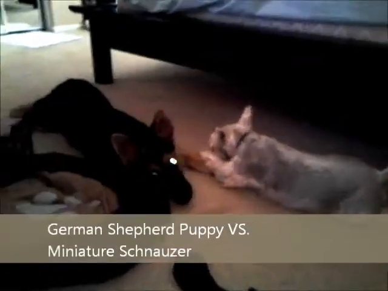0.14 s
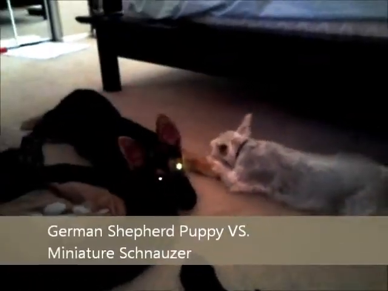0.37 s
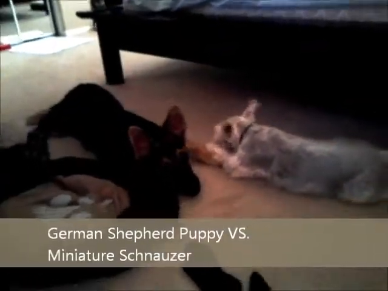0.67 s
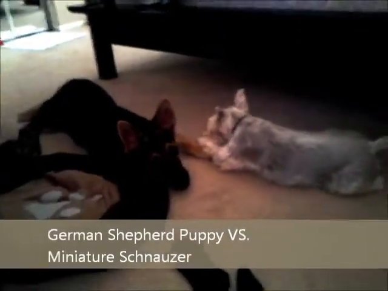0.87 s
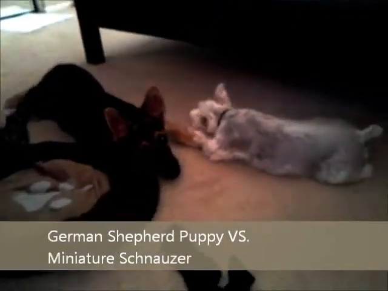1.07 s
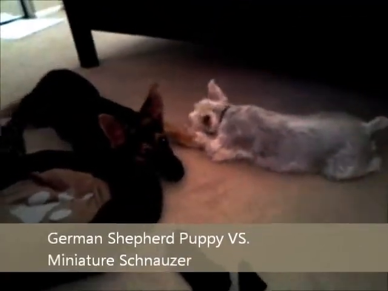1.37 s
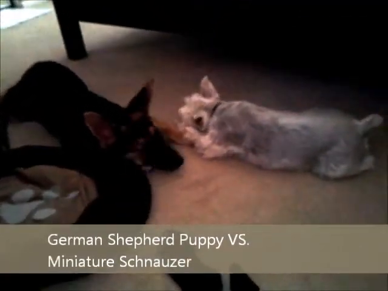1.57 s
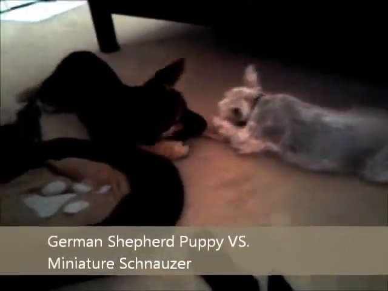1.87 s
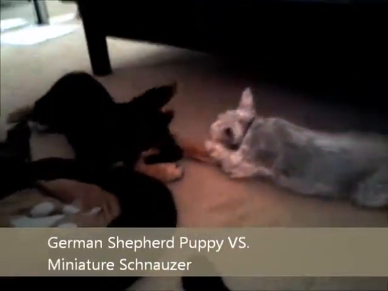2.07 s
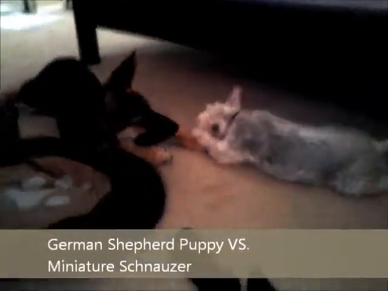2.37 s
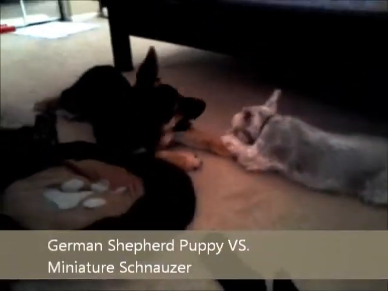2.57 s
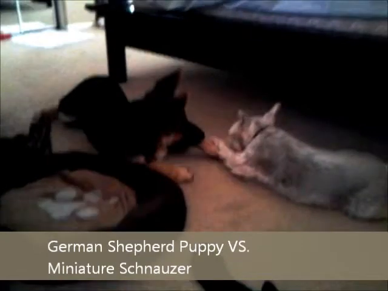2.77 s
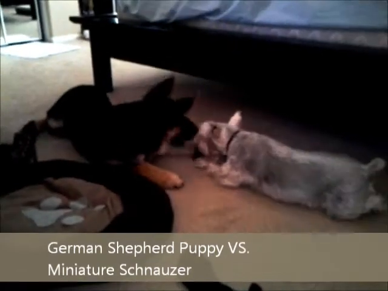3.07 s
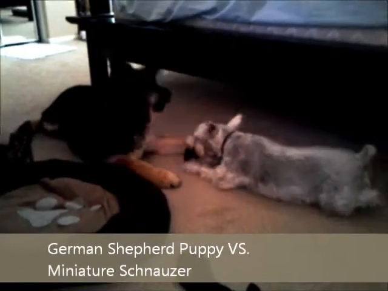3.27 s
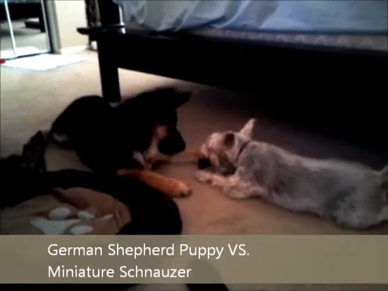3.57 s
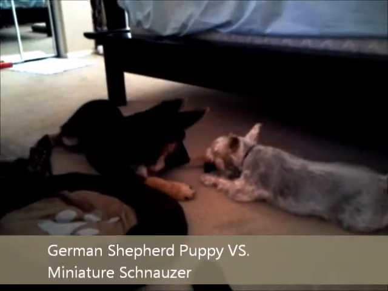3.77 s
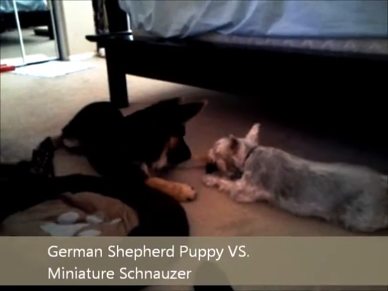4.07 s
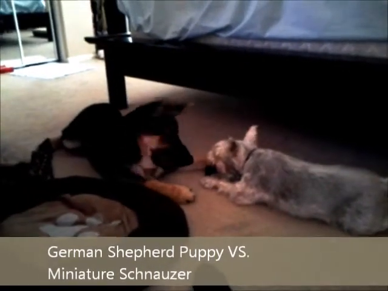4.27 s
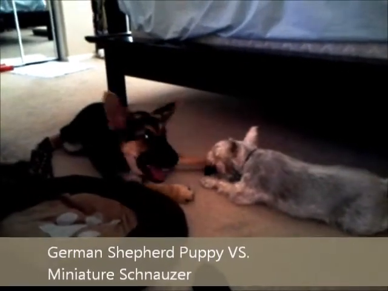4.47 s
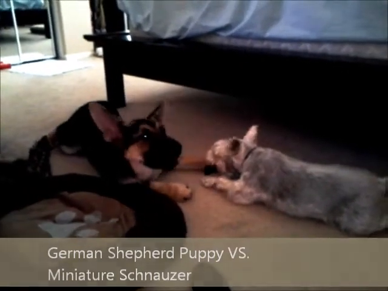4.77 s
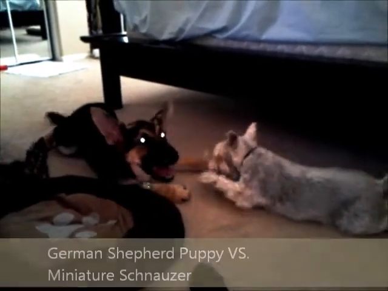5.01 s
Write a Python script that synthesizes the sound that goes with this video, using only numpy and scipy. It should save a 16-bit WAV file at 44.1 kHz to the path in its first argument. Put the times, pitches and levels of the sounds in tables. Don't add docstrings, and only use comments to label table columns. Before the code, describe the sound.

Two dogs squabble on bedroom carpet: sharp high yelps, nose whistles and a whimper, then hoarse barks, throbbing growls and a closing whine.

```python
import sys
import numpy as np
from scipy import signal
from scipy.fft import rfft, irfft, next_fast_len
from scipy.io import wavfile
from scipy.ndimage import uniform_filter1d, minimum_filter1d

SR = 44100
rng = np.random.default_rng(int(sys.argv[2]) if len(sys.argv) > 2 else 0)


def decibels_to_gain(level_db):
    exponent = np.asarray(level_db, float) / 20
    return 10 ** exponent


def to_wav(sig):
    pcm = np.clip(np.atleast_2d(sig), -1, 1) * 32767
    pcm = np.round(pcm).astype(np.int16)
    wavfile.write(sys.argv[1], SR, pcm.T)


N = 226787
TIME = np.arange(N) / SR

# hz, density_db
NOSE_AIR = [(2500, -6.5), (3500, -5.5), (5500, 4), (7000, 0), (9000, -16.5), (14000, -22)]
# hz, density_db
DULL_CONTACT = [(120, -53), (200, -5), (609, 0.5), (662, 4.5), (1250, -4.5), (2720, -9.5), (3500, -14.5),
                (4550, -47.5), (7700, -120)]


def rms_one(x):
    return x / np.sqrt(np.mean(x ** 2) + 1e-20)


def high_pass(x, cut_hz, order):
    return signal.sosfilt(signal.butter(order, cut_hz, "high", fs=SR, output="sos"), x)


def column(rows, index, outside=-120):
    rows = np.array(rows, float)
    return np.interp(TIME, rows[:, 0], rows[:, index], left=outside, right=outside)


def at_hz(points, hz):
    points = np.array(points, float)
    return np.interp(np.log(hz), np.log(points[:, 0]), points[:, 1])


def coloured(spectrum):
    size = next_fast_len(N)
    hz = np.maximum(np.arange(size // 2 + 1) * SR / size, 1)
    white = rfft(rng.standard_normal(size))
    return rms_one(irfft(white * decibels_to_gain(at_hz(spectrum, hz)), size)[:N])


def wobble(cut_hz):
    low_pass = signal.butter(4, cut_hz, fs=SR, output="sos")
    return rms_one(signal.sosfilt(low_pass, rng.standard_normal(N)))


def resonances(x, peaks):
    out = 0
    for k, (hz, width_hz, db) in enumerate(peaks):
        r = np.exp(-np.pi * width_hz / SR)
        zeros = [(1 - r * r) / 2, 0, (r * r - 1) / 2]
        poles = [1, -2 * r * np.cos(2 * np.pi * hz / SR), r * r]
        out = out + (-1) ** k * decibels_to_gain(db) * signal.lfilter(zeros, poles, x)
    return out


def strikes(rows, index):
    rows = np.array(rows, float)
    out = np.full(N, 1e-18)
    out[(rows[:, 0] * SR).astype(int)] = decibels_to_gain(rows[:, index])
    return out


def fade(x, attack_s, decay_s):
    a = np.exp(-1 / (attack_s * SR))
    d = np.exp(-1 / (decay_s * SR))
    return signal.lfilter([1 - a], [1, -a], signal.lfilter([1], [1, -d], x))


def swells(rows):
    swell_db = 25
    drops_db = np.array([99, swell_db, 0, 0, swell_db, 99])
    gain = 0
    for start_s, rise_s, hold_s, fall_s, db in rows:
        steps_s = [start_s - 1e-4, 1e-4, rise_s, hold_s, fall_s, .01]
        corners_s = np.cumsum(np.maximum(steps_s, 1e-5))
        gain = gain + decibels_to_gain(np.interp(TIME, corners_s, db - drops_db))
    return gain


def hiss():
    # hz, density_db
    floor_spectrum = [(12, -42.5), (20, 2), (352, -9.5), (405, -8.5), (479, -12.5), (1070, -15.5),
                      (1200, -15.5), (2930, -18.5), (15600, -25)]
    return decibels_to_gain(-60 + 1.1 * wobble(5.1)) * coloured(floor_spectrum)


def rustle():
    # start_s, rise_s, hold_s, fall_s, level_db
    fur = [(.001, .001, 0.0085, 0.19, -56.5), (.063, 0.0072, 0.032, 0.044, -44),
           (.11, 0.024, 0.016, 0.0041, -45), (.26, 0.053, 0.0039, 0.028, -57),
           (.72, 0.73, 0.0052, .12, -85), (.9, 0.49, 0.0033, 0.035, -59), (2.7, 0.14, 0.0032, 0.082, -45.5),
           (3.06, 0.018, 0.037, 0.18, -47)]
    # hz, density_db
    fur_spectrum = [(880, -17.5), (1500, 1.5), (1950, -5), (3150, 0), (7300, 2.5), (7980, 0.5),
                    (8970, -1.5), (15500, -6)]
    # start_s, rise_s, hold_s, fall_s, level_db
    paws = [(.001, 0.00035, 0.0046, 0.023, -42), (.2, 0.083, .005, 0.037, -62),
            (.72, 0.012, 0.17, 0.12, -52.5), (.9, 0.054, 0.51, .05, -70.5),
            (1.84, 0.074, 0.0046, 0.047, -51.5), (2.78, 0.051, .005, 0.1, -45)]
    # start_s, rise_s, hold_s, fall_s, level_db
    thumps = [(3.19, 0.056, 0.0022, .07, -37), (3.25, 0.059, 0.041, 0.27, -54.5)]
    # start_s, rise_s, hold_s, fall_s, level_db
    snorts = [(3.42, 0.069, 0.06, 0.33, -55.5)]
    grain = decibels_to_gain(0.45 * wobble(210.0))
    bright = decibels_to_gain(-3.5) * swells(fur) * coloured(fur_spectrum)
    dull = decibels_to_gain(-2.5) * swells(paws) * coloured(DULL_CONTACT)
    thump = swells(thumps) * coloured([(20, -13.0), (42, -4.0), (70, -1.5), (150, -37.5), (400, -43.5)])
    return grain * (bright + dull) + thump + swells(snorts) * coloured(NOSE_AIR)


def ticks():
    # start_s, peak_db, dull_part_db
    contacts = np.array([(0.0665, -28, -26), (0.7287, -31, -11.5), (0.78, -32, -13.5),
                         (0.821, -33.5, -15.5), (0.849, -37.5, -10.5), (0.8654, -35.5, -15.5),
                         (0.967, -40.5, -10.5), (0.9984, -26.5, -20), (1.164, -38.5, -11.5),
                         (1.276, -43, -10.5), (2.258, -37.5, -15), (2.339, -48, -3.5), (2.65, -47, 6),
                         (3.07, -30.5, -37.5), (4.435, -51.5, -28.5), (4.785, -18.5, -8.5)])
    start_s, peak_db, dull_db = contacts.T
    clicks = strikes(contacts, index=1)
    crack = fade(clicks, .0001, 0.00078) + decibels_to_gain(-13.0) * fade(clicks, 0.00083, 0.019)
    knocks = strikes(np.c_[start_s, peak_db + dull_db + 4], index=1)
    bright = coloured([(700, -31.0), (1800, 4), (5000, 11.5), (9000, 1.0), (15000, -19.0)])
    return decibels_to_gain(-6) * crack * bright + fade(knocks, 0.0012, 0.0072) * coloured(DULL_CONTACT)


def hoarseness():
    # start_s, end_s, roughness (0-1)
    spells = [(2.088, 2.2, .5), (2.468, 2.592, .6), (2.592, 2.65, .2), (2.768, 2.9, .25), (3.17, 3.24, .2),
              (3.24, 3.378, .6), (3.378, 3.415, .2), (3.415, 3.5, .33), (4.793, 4.93, .65),
              (4.93, 4.98, .22), (4.98, 5.15, .1)]
    clear, break_s = .08, .014
    rough = clear
    for start_s, end_s, share in spells:
        rough = rough + (share - clear) * (TIME >= start_s) * (TIME < end_s)
    return uniform_filter1d(rough, size=int(break_s * SR))


def tract_partials(tract, throat, count, pitch_hz, level_db, opening, press_db):
    shut_hz, mouth_width_hz, throat_width_hz, slope_db, upper_hz = tract
    throat_hz, pocket_hz, pocket_db, upper_db = throat
    order = np.arange(1, count + 1)[:, None]
    hz = order * pitch_hz
    gain = decibels_to_gain((slope_db + press_db) * np.log2(np.minimum(order, 4)))
    mouth_hz = shut_hz * 2 ** opening
    for centre, width in (mouth_hz, mouth_width_hz), (throat_hz, throat_width_hz):
        gain = gain * centre ** 2 / np.hypot(centre ** 2 - hz ** 2, width * hz)
    for centre, width, db in (pocket_hz, 600, pocket_db), (upper_hz, 350, upper_db):
        detuning = centre ** 2 - hz ** 2
        gain = gain * np.hypot(detuning, decibels_to_gain(db) * width * hz) / np.hypot(detuning, width * hz)
    return list(level_db + 10 * np.log10(gain ** 2 / np.sum(gain ** 2, axis=0)))


def voice(calls, breaths_db, tract, throats, mouth, air, air_db, rough, count, order=4):
    split_hz = 3400
    medium_db, breath_follows = -26, 0.44
    out, breath = np.zeros(N), coloured(air)
    shake = [wobble(133.6) for k in range(count)]
    patches = [wobble(25.) for k in range(count)]
    for rows, breath_db, throat in zip(calls, breaths_db, throats):
        on = slice(int(rows[0][0] * SR) + 1, int(rows[-1][0] * SR))
        contours = [uniform_filter1d(column(rows, index=c)[on], size=150) for c in range(1, len(rows[0]))]
        pitch_hz, level_db, *shape = contours
        if tract:
            partials_db = tract_partials(tract, throat, order, pitch_hz, level_db, *shape)
            air_level_db = breath_db + breath_follows * (level_db - medium_db)
        else:
            partials_db = [level_db, level_db + shape[0]]
            air_level_db = breath_db + 0 * level_db
        phase = 2 * np.pi * np.cumsum(pitch_hz) / SR
        age = np.arange(len(phase))
        left = on.stop - on.start - age
        edge = np.minimum(1, np.minimum(age, left / 9) / (0.00071 * SR))
        for k in range(1, count + 1):
            db = partials_db[min(k, len(partials_db)) - 1]
            share = np.minimum(.9, rough[on] * min(k, 4) ** .5)
            if k > len(partials_db):
                voiced = k * pitch_hz < split_hz
                base_db = np.where(voiced, np.maximum(*partials_db[-2:]), air_level_db)
                share = np.minimum(1, share + np.where(voiced, .1, .3))
                db = base_db + at_hz(mouth, k * pitch_hz) + 5.0 * patches[k - 1][on] * ~voiced
                db = np.minimum(db, np.maximum(*partials_db[:2]))
            steadiness = np.sqrt(1 - share ** 2) + share * shake[k - 1][on]
            wave = steadiness * np.sin(k * phase + k * k)
            wave *= 1 + 0.023 * (k > 1) * np.cos(phase / 2)
            out[on] += edge * np.sqrt(2) * decibels_to_gain(db) * wave
        leak = np.sqrt(rough[on] + .04)
        gate = 1 + 0.24 * np.cos(phase)
        out[on] += edge * leak * decibels_to_gain(air_level_db + air_db) * gate * breath[on]
    return out


def nose_whistles(hoarse):
    # start_s, pitch_hz, level_db, second_partial_lift_db (nostril pinch)
    whistles = [
        [(1.58, 4400, -65, -3), (1.67, 4276, -51.5, -5), (1.7, 4153, -54, -6), (1.755, 4140, -55.5, 12),
         (1.795, 4430, -45, -32), (1.865, 4380, -46, -8.5), (1.89, 4134, -44.5, -2.5), (1.955, 4010, -62, 16),
         (1.988, 4550, -35.5, -26)],
        [(2.462, 3900, -66.5, 25.5), (2.475, 3594, -65, 22.5), (2.492, 3570, -51, 18), (2.505, 3186, -50, 0)],
        [(2.552, 3406, -86, 3), (2.565, 3234, -31, -6.5), (2.585, 3666, -38, 2), (2.61, 3714, -50, 4),
         (2.635, 3690, -53, -6)],
        [(4.82, 4460, -59, 12), (4.832, 3830, -53, 13.5), (4.845, 3502, -42, 1), (4.89, 2870, -76, -1),
         (4.915, 3162, -45, 2), (4.932, 3466, -22.5, -20.5), (4.942, 3900, -29, 2)],
        [(1.955, 3850, -58, -27), (2.03, 4250, -58, 10)],
        [(4.17, 1426, -68, -24), (4.33, 1330, -70.5, -20)],
    ]
    breaths_db = [-53.5, -51.5, -49.5, -51.5, -55, -91]
    # hz, gain_db
    top = [(9000, -12), (14000, -18)]
    return voice(whistles, breaths_db, None, whistles, top, NOSE_AIR, air_db=0.0,
                 rough=np.maximum(hoarse, .38), count=3)


def small_dog(hoarse):
    # start_s, pitch_hz, level_db, mouth_opening_octaves, fold_pressure_db (per octave)
    yelps = [
        [(1.97, 770, -71, 0.79, -1), (1.984, 779, -30, 1.18, -11.5), (2.012, 815, -23, 1.52, -18.5),
         (2.04, 763, -27, 0.79, -2), (2.056, 738, -6, 0.16, 0.5), (2.076, 673, -16.5, 0.53, 4),
         (2.096, 730, -38, 0.4, 6), (2.152, 714, -34.5, 0.43, 1), (2.166, 710, -40.5, 0.59, 8)],
        [(2.397, 743, -50, 0.19, 6), (2.407, 738, -11, 0.93, -3), (2.425, 756, -9.5, 1, 0.65),
         (2.437, 786, -0.5, 0.45, 2.5), (2.447, 802, -8.5, 0.97, 7), (2.456, 779, -5, 0.57, 3),
         (2.468, 750, -25, 1, 12), (2.487, 751, -24, 0.8, 7), (2.53, 765, -46.5, 0.6, 5.5)],
    ]
    last_yelp = [(4.701, 701, -64, 1.6, -13), (4.71, 706.5, -25.5, 1.65, -5), (4.725, 709.6, -12, 1.76, -4),
                 (4.744, 781, -7.5, 1.65, -10.5), (4.76, 798, -8.5, 1.7, -16.5),
                 (4.779, 771.4, -11, 1.82, -3.5), (4.788, 692, -3.5, 1.43, 7), (4.797, 625, -15.5, 1.2, 11),
                 (4.815, 582, -19.5, 2.15, -5)]
    whimper = [(2.53, 755, -49, 1.8, -6), (2.598, 666.5, -48, 0.47, 16), (2.645, 653.4, -36, 0.53, 10),
               (2.661, 685, -29.5, 0.48, 16.5), (2.702, 695.5, -23.5, 1.38, -12.5),
               (2.744, 700.5, -23, 1.86, -6.5), (2.757, 686.6, -28, 1.78, -5.5),
               (2.778, 626.5, -37.5, 1.7, -10), (2.835, 531, -42, 1.96, -6.5)]
    breaths_db = [-52.5, -48.5, -46, -47]
    # shut_mouth_hz, mouth_width_hz, throat_width_hz, fold_slope_db (per octave), upper_hz
    tract = (511, 220.5, 258, -10.5, 3194.5)
    # throat_hz, side_pocket_hz, pocket_depth_db, upper_db
    throats = [
        (2244, 2520, -19, 26),
        (2330, 2750, -8.5, 15),
        (2320, 2450, -15.5, 22),
        (2244, 3700, -20, 4),
    ]
    # hz, gain_db
    mouth = [(3410, -31), (3900, -16), (4600, -11), (5300, -12.5), (7500, -16), (10000, -23.5),
             (14000, -36.5)]
    # hz, density_db
    air = [(1200, -1), (3300, 1.5), (4800, -2), (6500, -15), (9000, -7.5), (15000, -13)]
    return voice(yelps + [last_yelp, whimper], breaths_db, tract, throats, mouth, air, air_db=4.1,
                 rough=hoarse, count=14)


def growl():
    # start_s, first_gap_s, first_throb_db, change_db (per throb)
    bouts = [
        (3.5174, .037, -25.5, -1.15),
        (4.504, .039, -33.5, -0.16),
        (4.827, 0.036, -29.5, -0.28),
    ]
    counts = (10, 5, 8)
    # start_s, peak_db
    lone_throbs = [(2.299, -38.5), (2.346, -43.5), (3.214, -23.5), (3.271, -30)]
    # hz, width_hz, gain_db
    growl_throat = [(135.2, 40, -3), (235, 91, -3.5), (298, 54, 3.5), (429, 70, -1), (511, 82.5, -8),
                    (858, 37, -9.5), (1030, 26, -8), (1272, 97, -5), (2460, 370, -14), (2940, 410, -20.5),
                    (5950, 480, -26.5)]
    # start_s, rise_s, hold_s, fall_s, level_db
    rasps = [(2.075, 0.014, 0.036, 0.06, -47), (2.452, 0.0077, 0.047, 0.15, -37.5),
             (3.2, 0.033, 0.03, .03, -41), (3.27, 0.0071, 0.012, 0.066, -35.5),
             (3.34, 0.012, 0.17, 0.13, -46), (4.54, 0.088, 0.012, 0.045, -49),
             (4.78, 0.035, 0.0028, 0.024, -29), (4.8, 0.023, 0.11, 0.14, -34.5)]
    # hz, width_hz, gain_db
    rasp_throat = [(850, 650, -5), (1320, 360, -1), (2240, 680, -4), (3070, 880, -21.5)]
    slowing_s = .00062
    beats = []
    for (start_s, gap_s, first_db, step_db), count in zip(bouts, counts):
        for k in range(count):
            beats.append((start_s + k * gap_s + k * k * slowing_s, first_db + k * step_db))
    starts = strikes([b for b in beats if b[0] < TIME[-1]], index=1)
    phase = np.cumsum(110 * decibels_to_gain(1.4 * wobble(40.))) / SR
    phase -= phase[np.maximum.accumulate(np.arange(N) * (starts > 1e-9))]
    slaps = (np.diff(np.floor(phase), prepend=0) != 0) * decibels_to_gain(2.0 * rng.standard_normal(N))
    throat = rms_one(resonances(rms_one(slaps) + .55 * rng.standard_normal(N), growl_throat))
    push = -minimum_filter1d(-fade(starts, .0002, .014), size=531, origin=265)
    throbs = decibels_to_gain(-12) * push + decibels_to_gain(-2.5) * fade(strikes(lone_throbs, index=1), 0.027, 0.016)
    rough_air = rng.standard_normal(N) * decibels_to_gain(1.0 * wobble(80.0))
    rasp = high_pass(rms_one(resonances(rough_air, rasp_throat)), 480, order=3)
    return throbs * throat + swells(rasps) * rasp


def big_dog(hoarse):
    # start_s, pitch_hz, level_db, mouth_opening_octaves, fold_pressure_db (per octave)
    barks = [
        [(3.178, 493, -56.5, 2.8, 3), (3.19, 534, -30, 0.67, 2), (3.218, 608.4, -25.5, 0.82, 12),
         (3.236, 573, -27.5, 1.67, -1.5), (3.25, 574, -40, 1.28, 3), (3.286, 503, -41, 0.66, 21),
         (3.32, 530, -49.5, 0.73, -4)],
        [(3.354, 411.3, -39, 2.1, -10), (3.37, 441.2, -28, 1.87, 7), (3.38, 374, -21.5, 1.82, -7.5),
         (3.392, 407.3, -21, 1.67, 4), (3.408, 419.4, -20.5, 1.7, 0.5), (3.418, 361.7, -27.5, 1.6, -5),
         (3.429, 341.5, -21, 1.79, 1), (3.446, 352.5, -33, 1.61, 1.5), (3.474, 339, -24.5, 2.1, 3)],
        [(4.038, 321, -51, 0.0086, -3), (4.056, 336, -28.5, 0.13, -4), (4.07, 348, -47, 0.24, 5.5),
         (4.085, 345, -30.5, 0.19, -17), (4.13, 372, -60, 0.0093, 7), (4.18, 365, -56, 0.43, 7)],
    ]
    whine = [(4.93, 459, -27, 1.97, 3), (4.94, 455, -26.5, 1.36, -1.5), (4.985, 423, -27.5, 0.41, 14),
             (5.01, 441, -25, 1.1, 7.5), (5.04, 433.6, -29, 0.39, 13), (5.07, 448.7, -29, 0.54, 13),
             (5.085, 452.6, -23.5, 0.75, 11.5), (5.115, 494, -24, 1.15, 11), (5.17, 512, -21.5, 0.76, 15.5)]
    breaths_db = [-45, -32.5, -77, -46.5]
    # shut_mouth_hz, mouth_width_hz, throat_width_hz, fold_slope_db (per octave), upper_hz
    tract = (311.5, 115, 311, -5, 2950.5)
    # throat_hz, side_pocket_hz, pocket_depth_db, upper_db
    throats = [
        (2380, 1440, -31, 1.8),
        (2380, 1630, -24, 5),
        (2470, 1700, -7.5, 0.93),
        (2024, 1800, -9, 6.3),
    ]
    # hz, gain_db
    mouth = [(2000, -25.5), (2500, 3.5), (3000, 0), (3390, -38), (3410, -20), (5000, -24), (8000, -25)]
    return voice(barks + [whine], breaths_db, tract, throats, mouth, NOSE_AIR, air_db=-6.0,
                 rough=hoarse, count=14, order=7)


def collar_tag():
    # start_s, peak_db
    hits = [
        (4.437, -65),
    ]
    # hz, width_hz, gain_db
    modes = [(2220, 60, 8.2), (1314, 26, 1.1)]
    return decibels_to_gain(56.0) * resonances(strikes(hits, index=1), modes)


def echoes(x):
    # delay_s, gain_db
    reflections = [(.0049, -23), (.0074, -14.5), (.0186, -13.5), (.0335, -13)]
    x = signal.sosfilt(signal.butter(2, [1150, 2620], "band", fs=SR, output="sos"), x)
    return sum(decibels_to_gain(db) * np.r_[np.zeros(int(delay_s * SR)), x][:N] for delay_s, db in reflections)


def room(x):
    t60_s, wall_cut_hz = 0.31, 3700
    out, dull = np.zeros(N), np.exp(-2 * np.pi * wall_cut_hz / SR)
    lags = (rng.uniform(0.01, .04, 10) * SR).astype(int)
    for k, lag in enumerate(lags):
        loop, gain, state = x.copy(), decibels_to_gain(-60 * lag / SR / t60_s), [0.]
        for i in range(lag, N, lag):
            back, state = signal.lfilter([gain * (1 - dull)], [1, -dull], loop[i - lag:i], zi=state)
            loop[i:i + lag] += back[:N - i]
        out += (loop - x) * (-1) ** k
    return out


def scene():
    hoarse = hoarseness()
    calls = nose_whistles(hoarse) + small_dog(hoarse) + big_dog(hoarse)
    calls = high_pass(calls, 260, order=4)
    dogs = rustle() + ticks() + calls + growl() + collar_tag()
    return (dogs + echoes(dogs) + decibels_to_gain(-18) * room(dogs) + hiss())[None]


def limiter(x):
    peak = uniform_filter1d(-minimum_filter1d(-np.abs(x), size=241), size=120)
    return x / np.maximum(1, peak)


def band_gate(x):
    # hz, limit_db
    gate_limits = [(300, -54), (3000, -39), (6000, -49.5), (12000, -45), (15000, -39)]
    bass_gate_db = -58
    hz, times, z = signal.stft(x, SR, nperseg=1024)
    bands = z[1:].reshape(32, 16, -1)
    level_db = 10 * np.log10(np.sum(np.abs(bands) ** 2, axis=1) + 1e-20)
    loudest_db = level_db.max(axis=0)
    limit_db = loudest_db + at_hz(gate_limits, hz[9::16])[:, None]
    dither_db = uniform_filter1d(rng.normal(0, 7.9, level_db.shape), size=2, axis=1)
    bass_db = 10 * np.log10(np.sum(np.abs(z[:7]) ** 2, axis=0) + 1e-20)
    z[1:] = (bands * (level_db + dither_db > limit_db)[:, None]).reshape(512, -1)
    z[:7] *= bass_db > loudest_db + bass_gate_db
    return signal.istft(z, SR, nperseg=1024)[1][:N]


def roll_off(x):
    return signal.sosfilt(signal.butter(12, 15720, fs=SR, output="sos"), x)


def record(dry):
    mix = band_gate(limiter(dry[0]))[None]
    return roll_off(mix)


dry = scene()
out = record(dry)
to_wav(out)
```